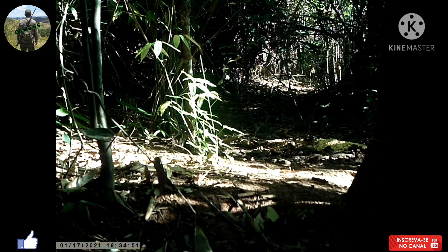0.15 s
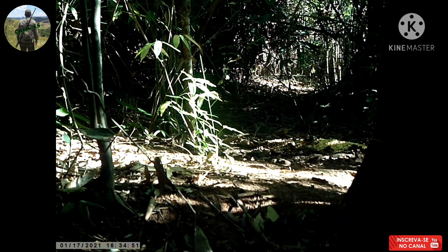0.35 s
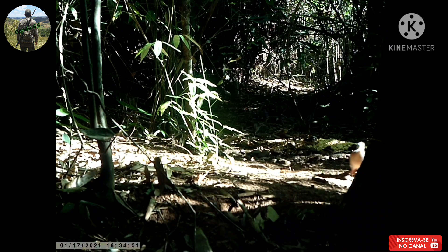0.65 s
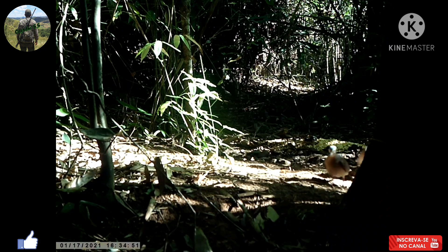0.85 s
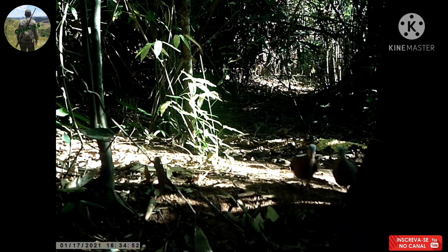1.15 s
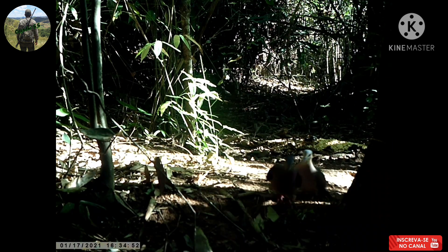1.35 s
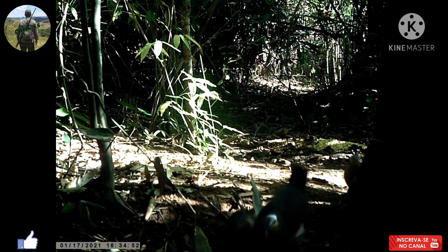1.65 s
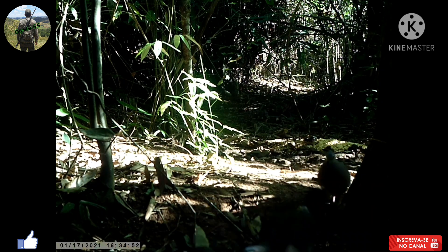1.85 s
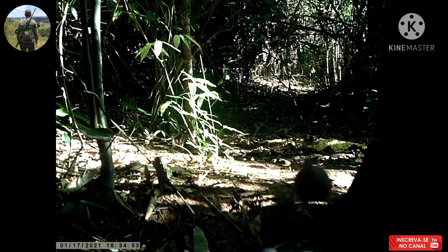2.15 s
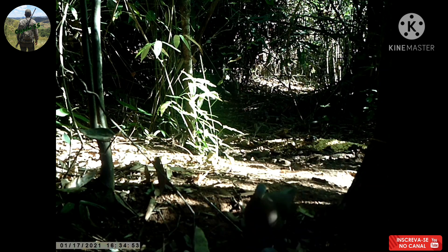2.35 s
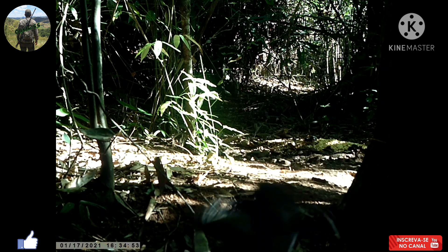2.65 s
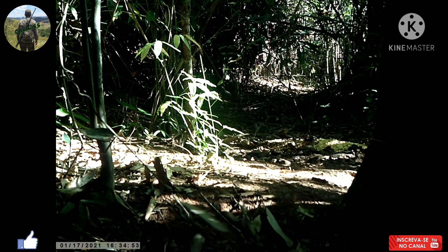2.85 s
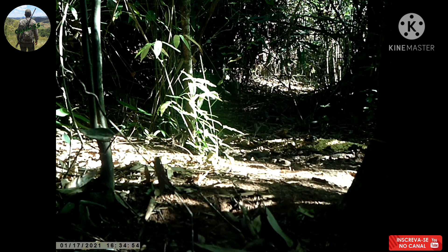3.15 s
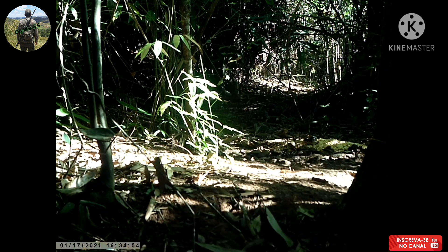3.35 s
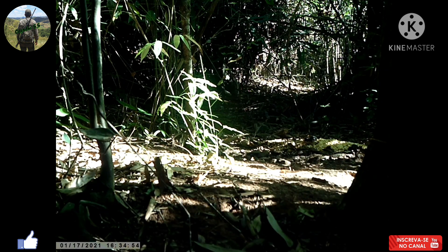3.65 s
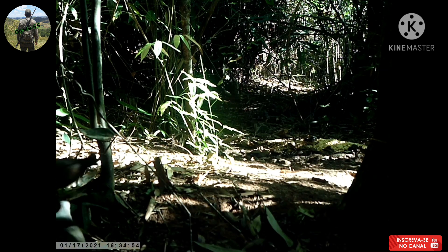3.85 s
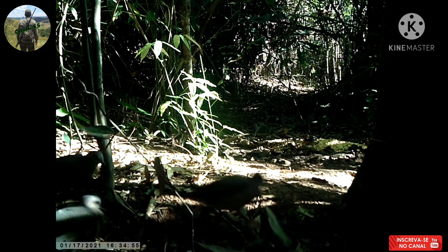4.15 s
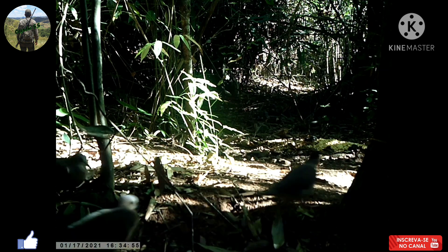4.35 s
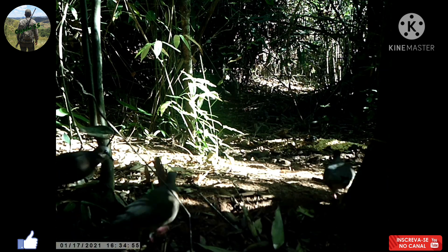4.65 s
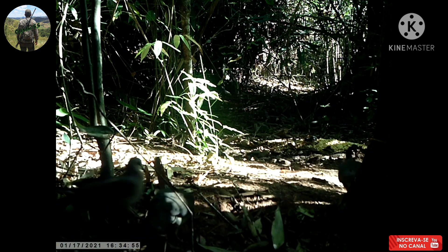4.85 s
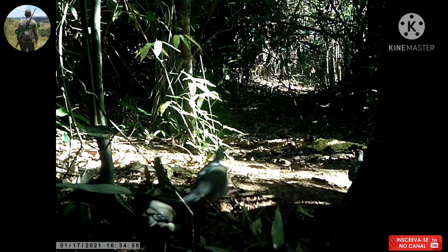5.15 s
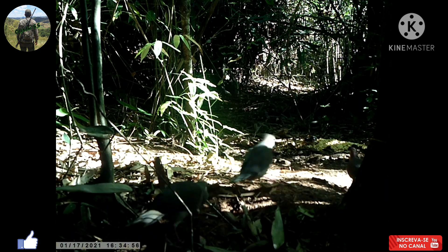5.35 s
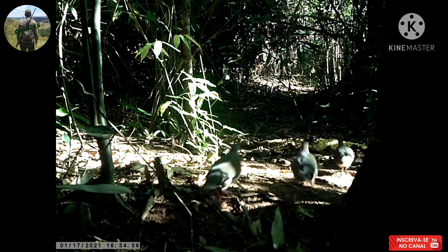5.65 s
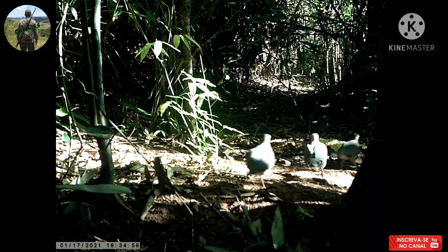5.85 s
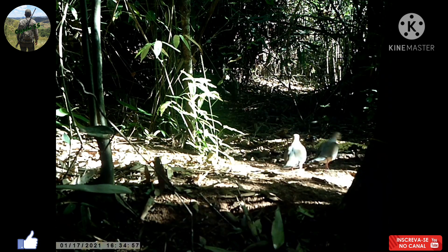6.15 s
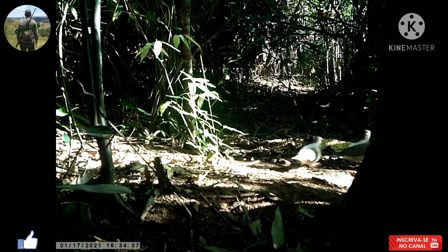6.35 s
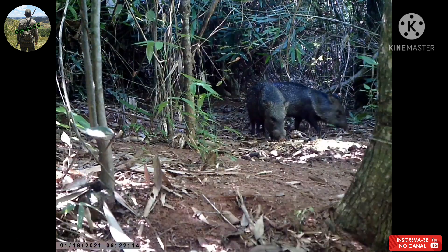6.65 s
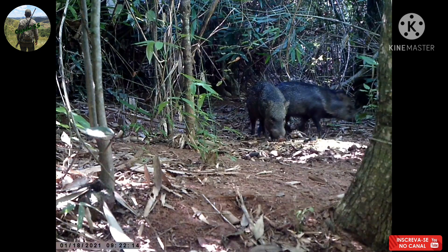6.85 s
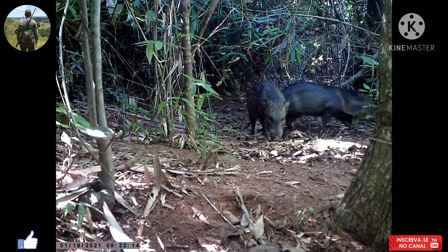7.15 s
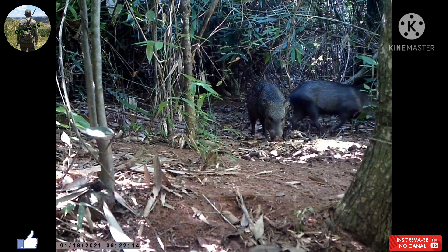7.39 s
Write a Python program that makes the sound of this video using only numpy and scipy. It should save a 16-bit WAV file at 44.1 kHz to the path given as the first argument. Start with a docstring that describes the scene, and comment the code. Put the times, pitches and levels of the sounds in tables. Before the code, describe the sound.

Dry leaf footsteps and snaps swell around one loud wing clap, over thumping, buzzing electronics; finally peccaries crack food beneath an insect-like sizzle.

```python
"""Woodland floor by a trail camera: doves walk in dry leaves; one claps its wings and sweeps the leaves aside.
Leaves are clouds of tiny ringing fractures over rubbing noise; snaps and wing slaps are short noise bursts.
A small bird whistles mostly falling notes and a dove grunts: gliding near-sine tones with a scattered tail.
The camera's electronics thump and buzz in a cycle, over a hissing floor. Near the end the scene changes to
peccaries cracking food (ringing noise bursts) behind a high sizzle of filtered noise and steady tones."""
import sys
import numpy as np
from scipy import signal
from scipy.fft import rfft, irfft
from scipy.io import wavfile

SR = 44100
rng = np.random.default_rng(int(sys.argv[2]) if len(sys.argv) > 2 else 0)


def wav_record(signal):
    """Record a signal, one row per channel, as 16-bit PCM in the file named by sys.argv[1]."""
    frames = np.transpose(np.atleast_2d(signal))
    bounded = np.clip(frames, -1, 1)
    # unit amplitude maps onto the largest positive 16-bit level
    quanta = np.round(bounded * 32767).astype(np.int16)
    wavfile.write(sys.argv[1], SR, quanta)


N = 331632
TIME = np.arange(N) / SR
SCENE_CHANGE_S = 6.556


def from_db(db):
    """Decibels to gain."""
    return 10 ** (np.asarray(db) / 20)


def rms_one(x):
    """Scale to rms 1."""
    return x / np.sqrt(np.mean(x ** 2) + 1e-20)


def in_time(rows):
    """Interpolate each column of a curve to every sample."""
    s, *columns = np.transpose(rows)
    return [np.interp(TIME, s, c) for c in columns]


def add(out, s, sound):
    """Mix a sound in at time s."""
    at = max(round(s * SR), 0)
    out[at:at + len(sound)] += sound[:N - at]


def cut(x, hz, kind, order=2):
    """Butterworth high- or low-pass."""
    sos = signal.butter(order, min(hz, .48 * SR), kind, fs=SR, output="sos")
    return signal.sosfilt(sos, x + 1e-18)


def resonance(x, hz, width_hz):
    """Two-pole resonance with gain 1 on top."""
    r = np.exp(-np.pi * width_hz / SR)
    zeros = np.array([1, 0, -1]) * (1 - r * r) / 2
    poles = [1, -2 * r * np.cos(2 * np.pi * hz / SR), r * r]
    return signal.lfilter(zeros, poles, x + 1e-18)


def coloured(x, spectrum, size=4096):
    """Causal (minimum-phase) filter with this spectrum; white noise keeps its level."""
    hz, db = np.transpose(spectrum)
    bins_hz = np.arange(size // 2 + 1) * SR / size
    gain = rms_one(from_db(np.interp(np.log(bins_hz + 1), np.log(hz), db)))
    # folding the cepstrum makes the phase minimum
    cepstrum = irfft(np.log(gain))
    cepstrum[1:size // 2] *= 2
    cepstrum[size // 2 + 1:] = 0
    impulse = irfft(np.exp(rfft(cepstrum)))
    return signal.oaconvolve(x, impulse)[:len(x)]


def drift(rate_hz, size=32):
    """Slow chance with spread 1, drawn at every 32nd sample."""
    noise = rng.standard_normal(N // size + 1002)
    slow = rms_one(cut(noise, rate_hz * size, "low")[1000:])
    return np.interp(np.arange(N) / size, np.arange(len(slow)), slow)


# floor spectrum: f/Hz, level/dB
FLOOR_SPECTRUM = [(15, -24), (25, 1), (134, -14.5), (236, -18), (301, -24), (463, -25), (1020, -33.5),
                  (1440, -36), (2910, -45.5), (3620, -42), (6560, -38.5), (14000, -47), (16000, -54)]


def noise_floor():
    """Steady background noise, weighted to the bass."""
    return from_db(-56.5) * coloured(rng.standard_normal(N), FLOOR_SPECTRUM)


# two bursts per cycle
CYCLE_S, BURSTS_AT_S, BURST_S = .6672, (.362, .633), .098
# short extra bursts: start t/s
EXTRA_BURSTS = [0.759, 1.829, 2.82, 3.833, 4.763, 5.835]
EXTRA_BURST_S = .034
REST_S = .3  # no regular burst starts this long after the scene change


def bursts():
    """Start and end of every burst of current: two to a cycle, and the short extra ones."""
    starts = np.add.outer(np.arange(-CYCLE_S, TIME[-1], CYCLE_S), BURSTS_AT_S).ravel()
    spans = []
    for s in starts:
        resting = 0 < s - SCENE_CHANGE_S < REST_S
        if -BURST_S < s < TIME[-1] and not resting:
            spans.append((max(s, 0), s + BURST_S))
    return spans + [(s, s + EXTRA_BURST_S) for s in EXTRA_BURSTS]


def electronics():
    """Every burst of current dents the supply, buzzes unevenly while it lasts and rebounds as it stops."""
    dents, rebounds, busy = np.zeros(N), np.zeros(N), np.zeros(N)
    t = TIME[:SR // 4]
    spans = bursts()
    for (start, end), (width, pace) in zip(spans, rng.standard_normal((len(spans), 2))):
        # a longer dent is a shallower one
        stretch = from_db(1.1 * width)
        age, since_end = t / (0.0063 * stretch), t / 0.02
        if start > 0:
            add(dents, start, -age * np.exp(1 - age) / stretch)
        rebound = since_end * np.exp(1 - since_end ** 2)
        undershoot = 0.43 * (since_end / 2) ** 2 * np.exp(1 - since_end / 1.36)
        add(rebounds, end, rebound - undershoot)
        cycle = 2 * np.pi * 110 * (1 + 0.025 * pace) * t
        pulsing = 1.57 + np.sin(cycle) + 0.34 * np.sin(2 * cycle)
        add(busy, start, pulsing * np.clip((end - start - t) / 0.0016, 0, 1))
    buzz = from_db(-51.5 + 3.2 * drift(66)) * cut(busy, 300, "low")
    return from_db(-32) * dents + from_db(-36.5) * rebounds + buzz


# sizzle level before trim: t/s, level/dB
SIZZLE_LEVEL = [(6.57, -51.5), (6.644, -51.5), (6.758, -59.5), (7.032, -60), (7.064, -56), (7.31, -57),
                (7.346, -55), (7.5, -55.5)]
# sizzle spectrum: f/Hz, level/dB
SIZZLE_SPECTRUM = [(1650, -26.5), (2800, -16.5), (3290, -21.5), (4240, -8), (5230, -6.5), (5650, -5.5),
                   (6060, -7), (6190, -9.5), (6550, -18), (8670, -11.5), (10900, -23), (12500, -24.5),
                   (15000, -32)]
# thin steady tones, before trim: f/Hz, level/dB
WHINE_TONES = [(3470, -79.5), (4083, -75.5), (4410, -81), (4909, -74.5), (5165, -72), (5466, -68.5),
               (5532, -70), (5854, -66), (5918, -76), (6200, -84), (6530, -76), (7590, -79), (8350, -82)]


def sizzle():
    """The last scene starts with a soft bump and carries a band of high hiss full of thin steady tones."""
    level_db, = in_time(SIZZLE_LEVEL)
    age = TIME[:N - round(SCENE_CHANGE_S * SR)]
    band = cut(coloured(rng.standard_normal(len(age)), SIZZLE_SPECTRUM), 2400, "high")
    hiss = from_db(level_db[-len(age):] - 1.5) * band
    tones = sum(from_db(db + 1.5) * np.sin(2 * np.pi * (hz * age + rng.random())) for hz, db in WHINE_TONES)
    air = from_db(-69.5) * rms_one(cut(rng.standard_normal(len(age)), 1870, "low"))
    bump = from_db(-36.0) * (np.exp(-age / 0.00049) - np.exp(-age / 0.11))
    return np.pad(hiss + tones + air + bump, (N - len(age), 0))


def woodland(x, t60_s, wet_db):
    """Trunks and foliage scatter a thin tail behind the sound."""
    t = TIME[:SR]
    echoes = rng.standard_normal(SR) * from_db(-60 * t / t60_s) * (1 - np.exp(-t / 0.013))
    tail = signal.oaconvolve(x, rms_one(echoes) / np.sqrt(SR))[:N]
    return x + from_db(wet_db) * tail


def notes(tracks, waver, fade_s):
    """Nearly pure gliding tones with a slightly unsteady pitch."""
    out, unsteady = np.zeros(N), 1 + waver * drift(210)
    for track in tracks:
        hz, db = in_time(track)
        to_edge_s = np.minimum(TIME - track[0][0], track[-1][0] - TIME)
        gate = np.clip(to_edge_s / fade_s + .5, 0, 1)
        phase = 2 * np.pi * np.cumsum(hz * unsteady) / SR
        out += gate * from_db(db) * np.sqrt(2) * np.sin(phase)
    return out


# one track per note, before trim: t/s, f/Hz, level/dB
WHISTLE_TRACKS = [
    [(.45, 4870, -68), (.475, 3990, -58), (.50, 2800, -66)],
    [(.972, 7000, -73), (.995, 6280, -56.5), (1.02, 6040, -70), (1.032, 4600, -56.5), (1.05, 3660, -60.5),
     (1.062, 2830, -70)],
    [(1.37, 7370, -60), (1.392, 7920, -61), (1.41, 5840, -54), (1.435, 5070, -57), (1.462, 3950, -60),
     (1.485, 3350, -63), (1.493, 2800, -64)],
]


def whistles():
    """A small bird's gliding whistle with a strong scattered tail."""
    return from_db(-0.5) * woodland(notes(WHISTLE_TRACKS, waver=0.029, fade_s=0.0045), t60_s=0.53, wet_db=-1.5)


# one track per grunt: t/s, f/Hz, level/dB
GRUNT_TRACKS = [
    [(1.308, 393, -94), (1.325, 369, -47), (1.345, 360, -56), (1.385, 296, -62)],
    [(1.425, 346, -68), (1.462, 367, -49), (1.485, 375, -68)],
]


def grunts():
    """A dove's low gliding tones, less steady in pitch, with a weaker tail."""
    return woodland(notes(GRUNT_TRACKS, waver=0.063, fade_s=.008), t60_s=0.28, wet_db=-10)


def cracks(rows, width_share, tail_db, break_s, top_hz):
    """Something brittle breaks: a sharp burst and a short tail, ringing around its own pitch."""
    out, t = np.zeros(N), TIME[:SR // 10]
    for s, db, hz, t60_s in rows:
        decay = np.exp(-t / break_s) + from_db(tail_db - 60 * t / max(t60_s, .002))
        burst = rng.standard_normal(len(t)) * decay
        ringing = rms_one(resonance(burst, hz, width_share * hz)) * np.sqrt(break_s / t[-1])
        add(out, s + 0.00082, from_db(db) * ringing)
    return cut(out, top_hz, "low")


# food breaking, before scaling: t/s, level/dB, centre f/Hz, t60/s
BITE_EVENTS = [(6.611, -46, 1660, 0.02), (6.621, -43, 796, 0.018), (6.9465, -35, 1310, 0.032),
               (7.096, -45.5, 1670, 0.021), (7.155, -50, 1510, 0.035), (7.206, -63, 1500, .018),
               (7.208, -34.5, 770, 0.02), (7.217, -39.5, 530, 0.027), (7.334, -36.5, 377, 0.01),
               (7.3345, -39, 780, 0.018), (7.335, -39, 1510, 0.088)]


def bites():
    """Peccaries crack food: narrow resonances with strong tails."""
    return from_db(-.5) * cracks(BITE_EVENTS, width_share=0.19, tail_db=6, break_s=0.00067, top_hz=3100)


def crackle(per_s, spread_db, friction_db, clump_db, patchy_db, count=12):
    """Tiny fractures of uneven size go to leaves that ring briefly at their own pitch, over rubbing noise."""
    fractures, rings = np.zeros(N), np.zeros(N)
    for hz in np.geomspace(900, 12000, count):
        where, size, sign, order = rng.random((12000, 4)).T
        at = (where * N).astype(int)
        # now these leaves, now those take the weight
        turns = np.linspace(0, 1, 200)
        weight_db = patchy_db * np.interp(where, turns, rng.standard_normal(len(turns)))
        size_db = spread_db * np.minimum(-np.log(size), 4)
        breaks = order < per_s * TIME[-1] / count / len(at)
        clicks = np.zeros(N)
        clicks[at] = breaks * np.sign(sign - .5) * from_db(weight_db + size_db)
        fractures += clicks
        rings += resonance(clicks, hz, 0.25 * hz)
    grains = rms_one(rings + 0.26 * fractures)
    # each fracture sets off a brief scrape, above a constant rub
    envelope = np.sqrt(cut(grains ** 2, 170, "low", order=1).clip(0))
    scrape = rms_one(envelope) + from_db(friction_db)
    rustle = grains + 0.85 * scrape * rng.standard_normal(N)
    return rms_one(rustle * from_db(clump_db * drift(70)))


def strokes(rows, roundness):
    """Each stroke swells and fades with its speed; gives the power of the treble and of the body."""
    crisp, body = np.zeros(N), np.zeros(N)
    for s, db, body_db, length_s in rows:
        speed = np.sin(np.pi * np.clip((TIME - s) / max(length_s, .01), 0, 1))
        power = (from_db(db) * speed ** roundness) ** 2
        crisp += power
        body += power * from_db(body_db) ** 2
    return crisp, body


def voiced(x, crisp, body, split_hz=2800):
    """Weigh the crisp top and the hollow body of a rustle."""
    return crisp * cut(x, split_hz, "high", order=3) - body * cut(x, split_hz, "low", order=3)


# leaf spectrum, also used by steps(): f/Hz, level/dB
LEAF_SPECTRUM = [(180, -42), (300, -5), (565, -2.5), (1060, -5), (1640, 0), (3520, -2), (7690, -1.5),
                 (12100, -4.5), (14500, -15), (16000, -26)]
# swelling and fading stir of leaves under the flock, before wander: t/s, treble level/dB, body level/dB re treble
STIR = [(0.0, -59, 1), (0.38, -56, -5.0), (0.68, -70, 5), (0.94, -72.5, 5.5), (1.35, -67.5, 2),
        (1.85, -51.0, -6), (2.3, -50.5, -3), (3.2, -48, -5.5), (3.6, -50.5, -3.5), (3.95, -47, -4),
        (4.28, -53.5, 1.0), (4.85, -51.0, -1.5), (5.24, -61, 2.5), (5.5, -57.5, 4.5), (5.66, -73, -7),
        (5.9, -56.5, 0.5), (6.25, -75.5, 2.5), (6.55, -71, 11)]
# feet and tails dragged through litter: start t/s, level/dB, body level/dB re treble, length/s
DRAGS = [(-0.006, -42.5, -9, 0.11), (0.412, -47, -5.5, 0.09), (0.565, -53.5, -8, 0.067),
         (0.825, -56, -8, 0.096), (1.864, -40.5, -5.5, 0.12), (1.969, -37, -10, 0.15),
         (2.103, -45, -9, 0.17), (2.405, -45.5, -1, 0.074), (3.008, -45.5, -5, 0.072),
         (3.125, -44, 1, 0.054), (3.254, -43, -0.5, 0.077), (3.478, -36, -4, 0.046),
         (3.767, -42.5, -9, 0.072), (3.82, -42, 4.5, 0.12), (3.995, -33.5, -8, 0.041),
         (4.052, -47, -2, 0.054), (4.456, -41, -3.5, 0.069), (4.925, -44.5, -4.5, 0.12),
         (6.355, -61.5, -5, 0.055)]
STIR_WANDER_DB, STIR_WANDER_HZ = 2.0, 16


def litter():
    """Leaves stir and tick under the walking birds, and swell wherever one shuffles through them."""
    stir_db, hollow_db = in_time(STIR)
    stir = from_db(stir_db + STIR_WANDER_DB * drift(STIR_WANDER_HZ))
    dragged, dug = strokes(DRAGS, roundness=0.79)
    crisp = np.sqrt(stir ** 2 + dragged)
    body = np.sqrt((stir * from_db(hollow_db)) ** 2 + dug)
    fine = crackle(per_s=3200, spread_db=3.5, friction_db=0.0, clump_db=1.5, patchy_db=8.5)
    rustle = voiced(coloured(fine, LEAF_SPECTRUM), crisp, from_db(0.5) * body)
    return rustle * (TIME < SCENE_CHANGE_S)


# feet crunching leaves, before trim: t/s, level/dB, body level/dB re treble, length/s, leaf ring f/Hz
FOOTFALLS = [(0.075, -41, -16.0, 0.024, 8650), (0.116, -46.5, -11, 0.046, 4300.0),
             (0.229, -51, -4.0, 0.02, 1400.0), (0.53, -48, -4, 0.058, 7340),
             (0.702, -52.5, -2.5, 0.085, 5660), (1.509, -49, -2.0, 0.03, 2500.0),
             (1.613, -51.5, -2.5, 0.069, 1400.0), (1.676, -40, 1, 0.093, 1410),
             (1.773, -44, 0, 0.069, 3300.0), (1.857, -36, -0.5, 0.051, 3700.0),
             (1.96, -34.5, -4, 0.081, 3270), (2.011, -37.5, 2.5, 0.077, 3700.0),
             (2.255, -42, -1.5, 0.037, 2160), (2.309, -38.5, -3, 0.044, 5700.0),
             (2.356, -42.5, -10, 0.012, 11500.0), (2.373, -41, -2, 0.0091, 3300.0),
             (2.437, -44, 4.5, 0.036, 2160), (2.598, -44.5, -14, 0.039, 2500.0),
             (2.638, -42, -6, 0.056, 5700.0), (3.401, -38.5, -7.5, 0.069, 4970),
             (3.459, -37.5, -4.5, 0.028, 4300.0), (3.528, -37.5, 0.5, 0.041, 5700.0),
             (3.629, -43, 3, 0.017, 5700.0), (3.83, -40, 2, 0.027, 1900.0), (3.877, -38, 9, 0.011, 1900.0),
             (3.941, -36.5, -0.5, 0.083, 11500.0), (4.026, -30.5, -3.5, 0.025, 2130),
             (4.147, -40, 4, 0.034, 11500.0), (4.166, -36, -5, 0.026, 11500.0),
             (4.191, -37.5, -1.5, 0.029, 1400.0), (4.215, -41.0, -1.5, 0.042, 2110),
             (4.303, -44.5, -9, 0.052, 2770), (4.338, -37, -1.5, 0.052, 3260),
             (4.443, -43.5, 0, 0.048, 1410), (4.599, -44.5, -12, 0.024, 11500.0),
             (4.724, -44.5, -16, 0.029, 11500.0), (4.857, -40, 0.5, 0.063, 1390),
             (4.936, -44.5, -11.0, 0.042, 3700.0), (5.112, -48.5, -4, 0.037, 7500.0),
             (5.262, -42.5, -10, 0.043, 3680), (5.542, -47.5, 1, 0.032, 2090),
             (5.572, -46, -5, 0.031, 8700.0), (5.708, -52, -3.5, 0.072, 2800.0),
             (5.797, -52, -7, 0.033, 1400.0), (5.828, -49.5, -4, 0.022, 1400.0),
             (5.853, -51.5, 2.0, 0.023, 1400.0), (6.156, -58.5, 1.5, 0.037, 5800)]
LEAF_RING_DB, LEAF_RING_WIDTH = -3, 0.44  # width as a share of ring pitch


def steps():
    """A foot comes down and crushes leaves in a short, dense crunch, coloured by the leaf right under it."""
    out, t = np.zeros(N), TIME[:SR // 5]
    grains = crackle(per_s=6500, spread_db=3.0, friction_db=-9.5, clump_db=2.0, patchy_db=5.5)
    coarse = coloured(grains, LEAF_SPECTRUM)
    for s, db, hollow_db, length_s, hz in FOOTFALLS:
        age = t / max(length_s, .005)
        press = (1 - np.exp(-age / 0.17)) * np.exp(-2 * age ** 1.9)
        texture = voiced(coarse[round(s * SR):][:len(t)], 1, from_db(hollow_db))
        crunch = texture * press / press.max()
        crunch = crunch + from_db(LEAF_RING_DB) * resonance(crunch, hz, LEAF_RING_WIDTH * hz)
        add(out, s, from_db(db - 2.0) * crunch)
    return out


# leaves and twigs breaking, before scaling: t/s, level/dB, centre f/Hz, t60/s
SNAP_EVENTS = [(0.049, -21.5, 7600, 0.053), (1.189, -42, 5890, 0.017), (1.761, -24, 6660, 0.022),
               (1.798, -20.5, 3880, 0.028), (1.898, -20.5, 3630, 0.014), (1.956, -22, 5450, 0.014),
               (1.977, -17, 7060, 0.012), (2.007, -16, 3600, 0.014), (2.073, -16.5, 3300, 0.014),
               (2.136, -23, 4500, 0.027), (2.567, -23.5, 8250, 0.0068), (2.853, -13.5, 5360, 0.018),
               (3.282, -20, 5060, 0.011), (3.392, -18.5, 4900, 0.03), (3.613, -26.5, 4160, 0.013),
               (3.632, -23, 6030, 0.014), (3.676, -25.5, 6900, 0.0041), (3.744, -21.5, 11100, 0.025),
               (3.8355, -18.5, 1760, 0.015), (3.878, -23, 1800, 0.02), (3.897, -26.5, 960, 0.011),
               (3.948, -27, 6620, 0.018), (4.034, -28, 3300, 0.024), (4.304, -28, 4500, 0.015),
               (4.355, -21.5, 7110, 0.025), (4.412, -24, 8170, 0.032), (4.5, -23, 7450, 0.027),
               (4.784, -31, 4800, 0.031), (4.869, -30, 2760, 0.024), (4.884, -32, 8840, 0.014),
               (5.389, -28, 6160, 0.035), (5.448, -30, 3100, 0.013), (5.478, -34, 3730, 0.025),
               (5.56, -27, 1930, 0.0081), (5.576, -23, 7260, 0.011), (5.72, -31.5, 3230, 0.023),
               (5.812, -38, 11000, 0.008), (5.829, -34, 10000, 0.01), (5.923, -29, 5330, 0.027),
               (5.997, -39, 7040, 0.018), (6.237, -51, 1430, 0.014)]


def snaps():
    """Single leaves and twigs break: wide resonances with weak tails."""
    return from_db(-2.0) * cracks(SNAP_EVENTS, width_share=0.47, tail_db=-5, break_s=0.0004, top_hz=10800)


# feather spray spectrum: f/Hz, level/dB
SPRAY_SPECTRUM = [(180, -34.5), (300, -11.5), (519, -14), (645, -8.5), (1100, -11), (1610, -7.5),
                  (5610, -4.5), (7820, -9.5), (11100, -9), (14500, -24), (16000, -36)]
# wing strokes over the ground, before trim: start t/s, hiss level/dB, air rush level/dB re hiss, length/s
WING_STROKES = [(2.686, -31, 5, 0.098), (2.766, -28, -4, 0.16), (2.879, -31.5, -5.0, 0.16)]


def wing_sweep():
    """Feathers rush through the air and blow a dense spray of leaves along the ground."""
    hiss, rush = np.sqrt(strokes(WING_STROKES, roundness=1.0))
    grains = crackle(per_s=9000, spread_db=4.0, friction_db=-1.0, clump_db=1.5, patchy_db=5.5)
    return voiced(coloured(grains, SPRAY_SPECTRUM), from_db(-.5) * hiss, from_db(0.5) * rush)


# slap spectrum: f/Hz, level/dB
SLAP_SPECTRUM = [(200, -14), (480, -8), (900, -8), (1550, 0.5), (2400, -6), (3400, -3), (4400, 0),
                 (6400, -5.5), (8400, -6), (10000, -14.5), (14500, -14.5), (16000, -27)]
# wing slaps, before trim and filters: t/s, noise level/dB, t60/s, air push level/dB
SLAPS = [(2.7581, -7.5, 0.047, -4), (2.766, -15.5, 0.04, -18)]


def wing_clap():
    """Each wing lands with a slap of feathers and squeezes out a push of air."""
    slap, air, t = np.zeros(N), np.zeros(N), TIME[:SR // 10]
    for s, db, t60_s, push_db in SLAPS:
        onset = 1 - np.exp(-(t / 0.00042) ** 2)
        decay = np.exp(-t / 0.0013) + from_db(-7.5 - 60 * t / t60_s)
        add(slap, s, from_db(db + 4) * onset * decay * rng.standard_normal(len(t)))
        push = (1 - np.exp(-(t / 0.00012) ** 2)) * np.exp(-t / 0.0023)
        add(air, s, from_db(push_db) * push)
    return coloured(slap, SLAP_SPECTRUM) + cut(air, 39, "high", order=1)


# hollows of the camera's case: f/Hz, width/Hz, level/dB
CASE_HOLLOWS = [(579, 70, 2), (847, 36, 2), (1570, 88, 0), (1910, 79, 1), (3120, 89, 2), (3510, 92, 1),
                (4260, 120, 0.5), (5080, 22, -2.5), (6830, 290, 2)]


def through_case(x):
    """The case's hollows raise narrow bands, or weaken them where the level is negative."""
    return x + sum((from_db(db) - 1) * resonance(x, hz, width_hz) for hz, width_hz, db in CASE_HOLLOWS)


def scene():
    """Near sounds share a tail and the case; the rest joins directly, equal in both channels."""
    close = snaps() + bites() + litter() + steps() + wing_sweep() + wing_clap()
    near = through_case(woodland(close, t60_s=0.48, wet_db=-16.5))
    calls = whistles() + grunts()
    background = noise_floor() + sizzle() + electronics()
    return np.tile(near + calls + background, (2, 1))


def record(dry):
    """The loudest peaks overload the input softly; a steep low-pass cuts the top."""
    clipped = dry / (1 + (dry / .7) ** 4) ** (1 / 4)
    lowpass = signal.ellip(10, .1, 80, 15700, fs=SR, output="sos")  # ripple/dB, stop/dB, cutoff/Hz
    return signal.sosfilt(lowpass, clipped)


dry = scene()
out = record(dry)
wav_record(out)
```